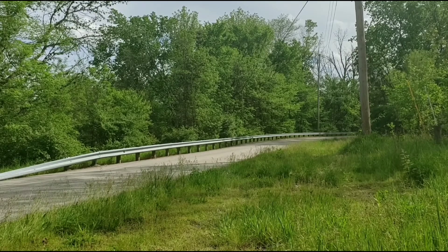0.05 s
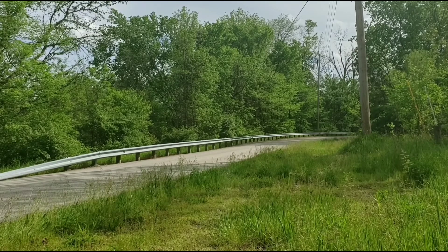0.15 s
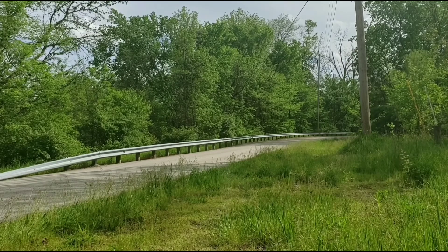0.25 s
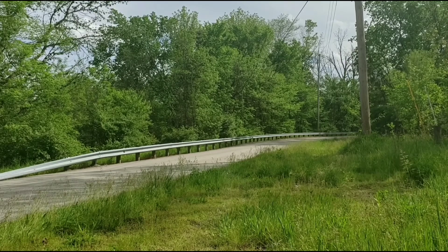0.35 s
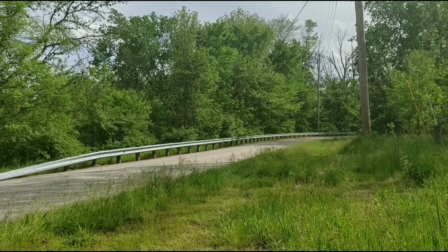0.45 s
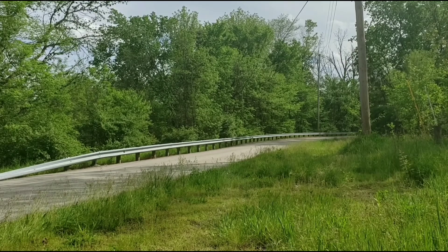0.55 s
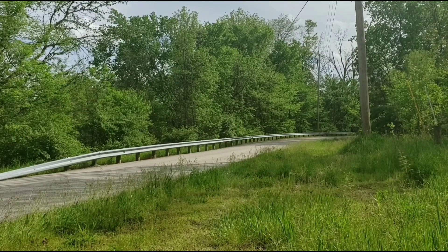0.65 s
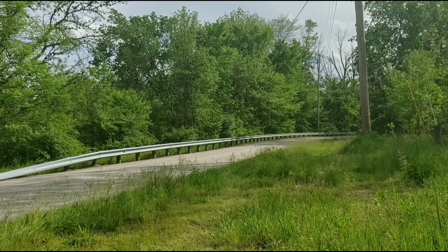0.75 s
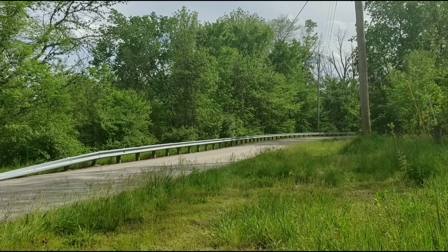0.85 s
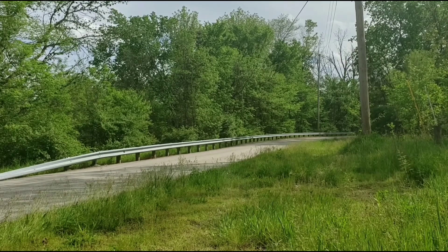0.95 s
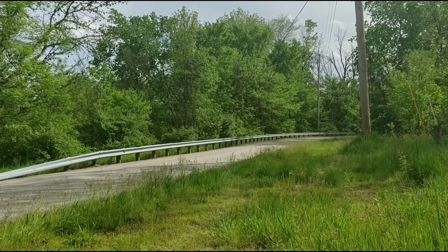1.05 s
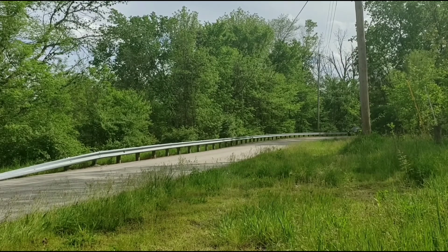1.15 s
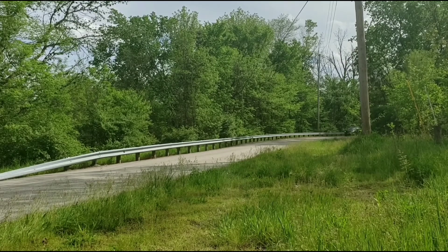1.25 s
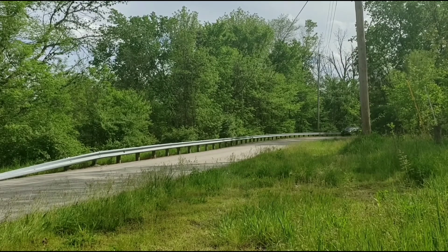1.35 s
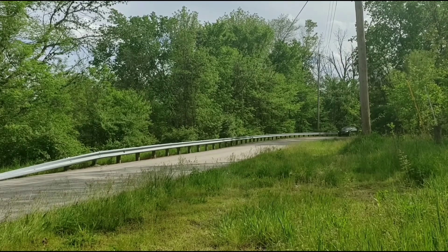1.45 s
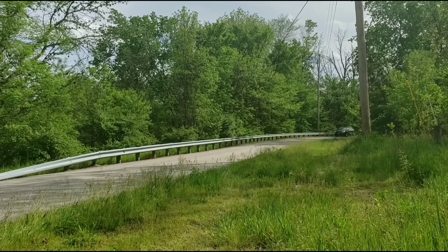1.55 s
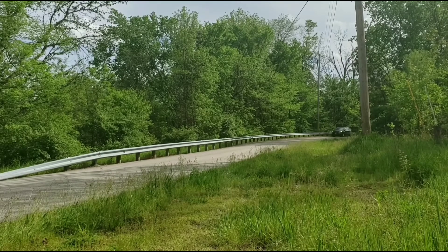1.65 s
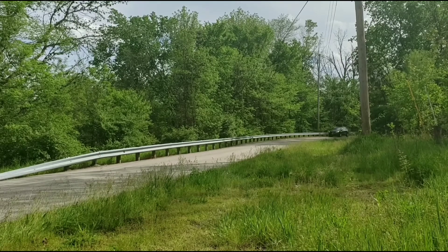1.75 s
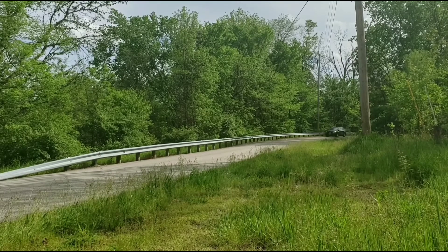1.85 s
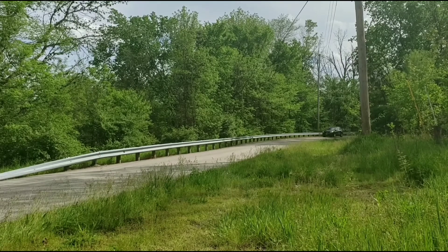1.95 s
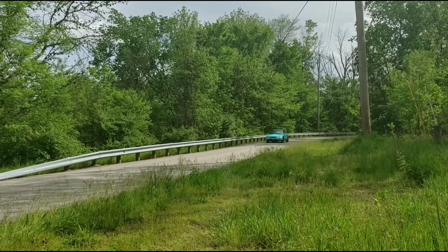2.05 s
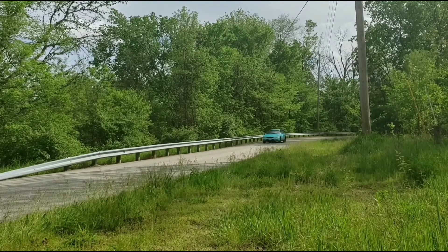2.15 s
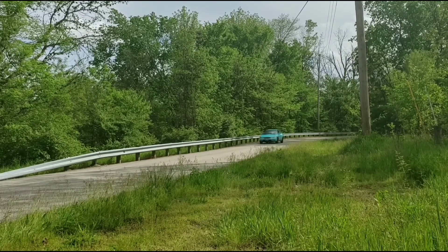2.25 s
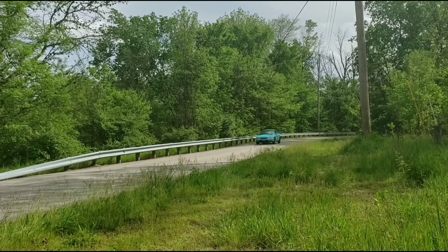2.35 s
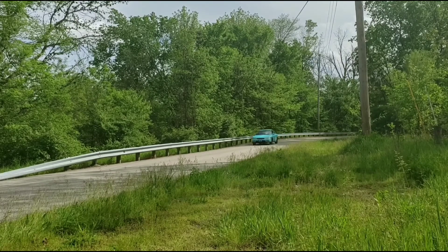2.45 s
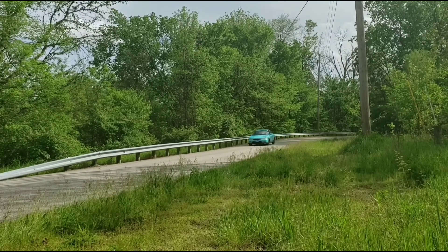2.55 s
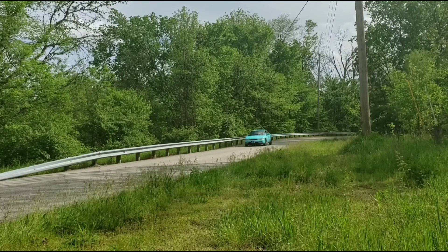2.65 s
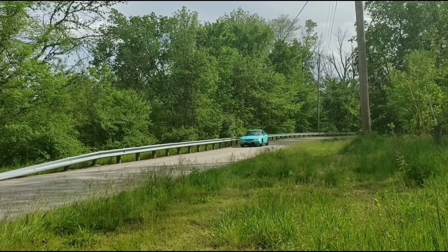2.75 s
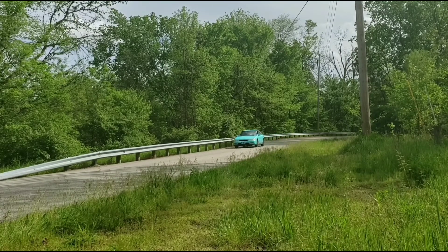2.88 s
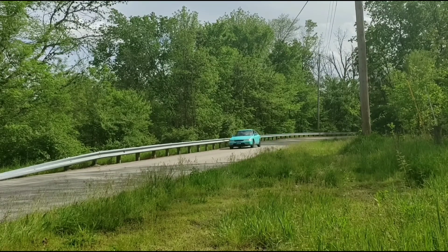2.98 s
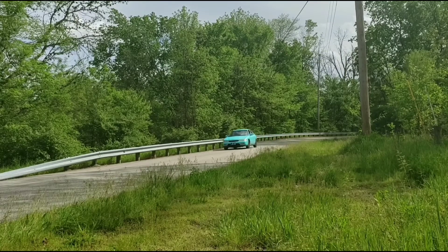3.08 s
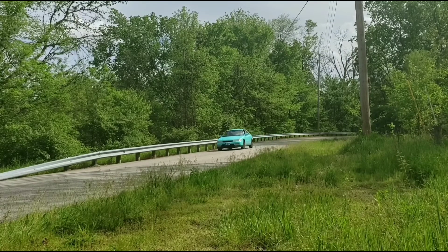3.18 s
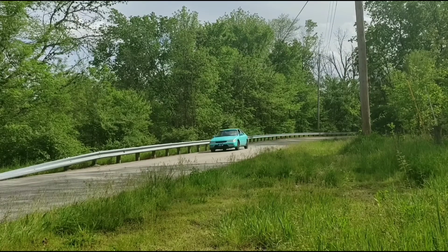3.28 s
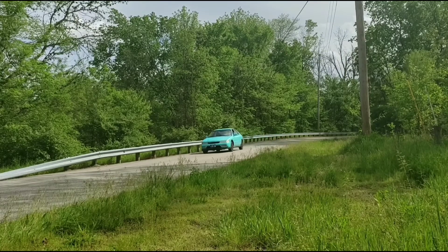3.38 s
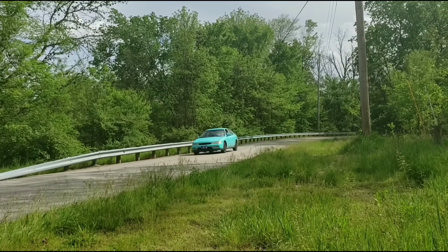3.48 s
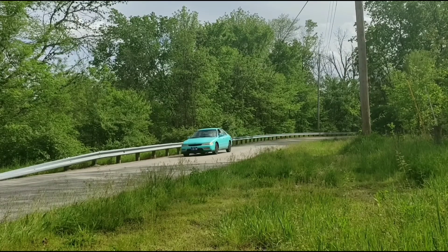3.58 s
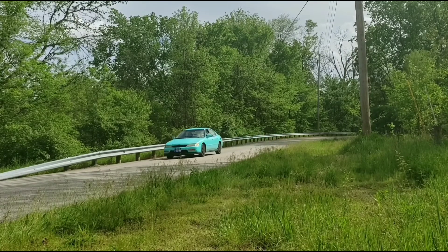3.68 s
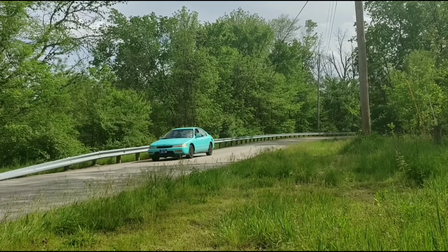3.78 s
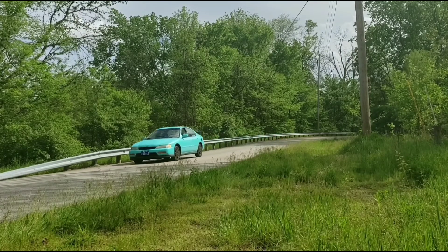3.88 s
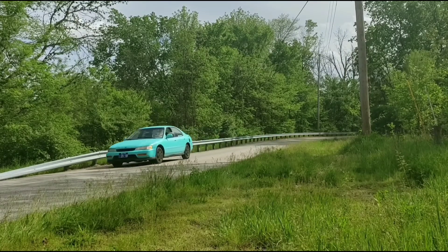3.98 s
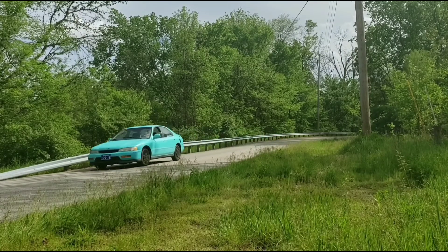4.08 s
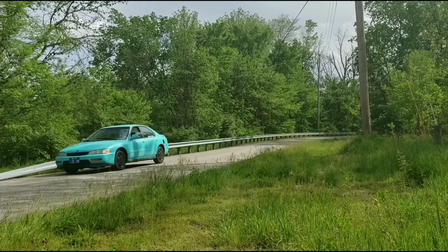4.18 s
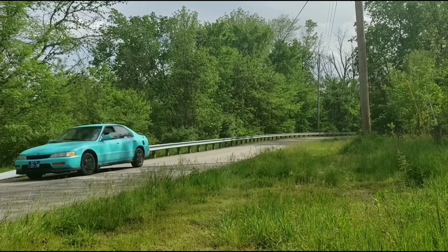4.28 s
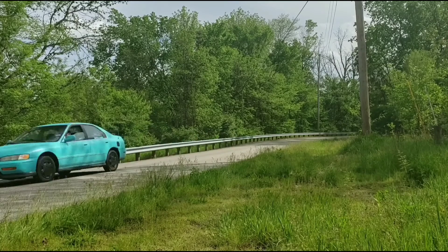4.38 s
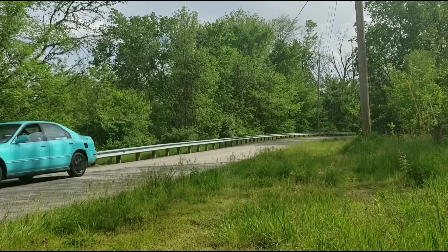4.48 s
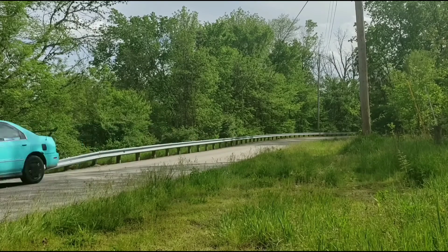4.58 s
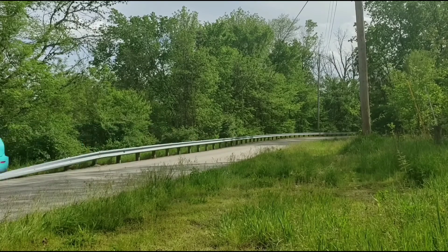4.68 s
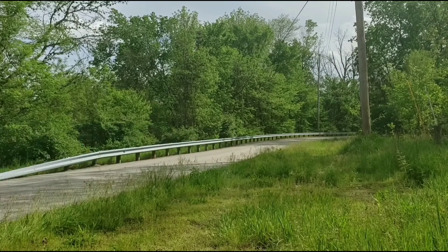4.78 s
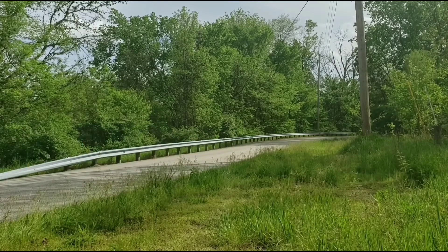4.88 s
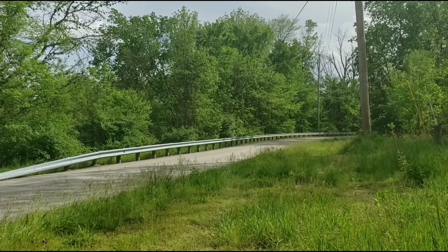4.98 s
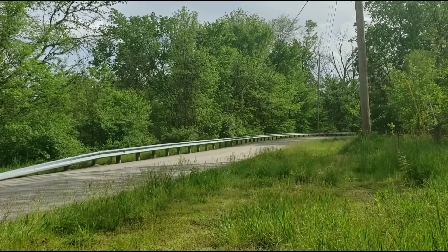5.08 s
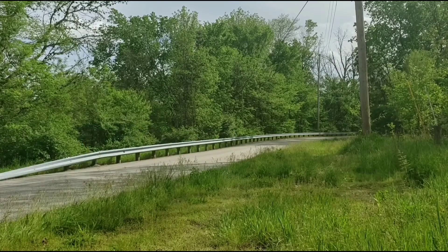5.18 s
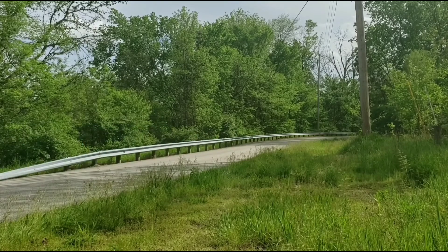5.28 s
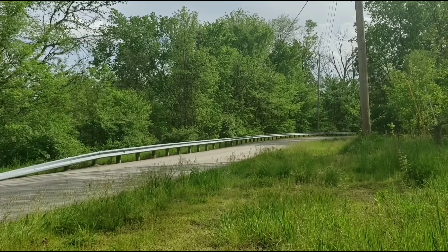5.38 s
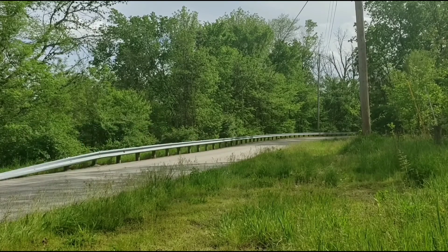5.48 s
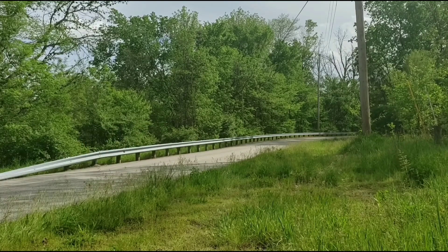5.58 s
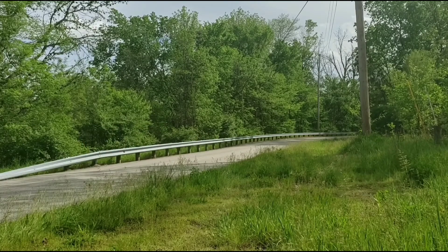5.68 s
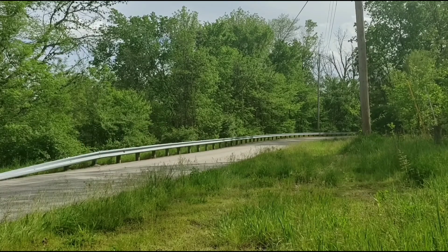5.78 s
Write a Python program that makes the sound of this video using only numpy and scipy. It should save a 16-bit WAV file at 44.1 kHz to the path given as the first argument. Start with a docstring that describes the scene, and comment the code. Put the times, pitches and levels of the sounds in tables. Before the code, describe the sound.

From 0 to about 2 s a quiet, unsteady low engine drone sags slowly in pitch far off, over soft dull roar and airy hiss. A songbird whistles a quick falling phrase four times, roughly every 0.4 s until 1.5 s, with thin notes from other birds and a soft echo from trees. Faint dry ticks flick around 1.7-1.85 s. Near 2.07 s everything drops to almost nothing for a twentieth of a second. Then a much louder, buzzy exhaust enters abruptly, pulling hard and climbing slightly until 3.45 s as hiss and roar swell. At 3.5 s it gives way to a lower, boomier, steadier note that grows and gently falls. It sweeps past close on the left, fullest around 4.7-5 s, with bright tyre hiss and a sharp pulsing metallic rasp at 4.95 s. Pitch keeps sinking and the noise thins, the deep exhaust continuing to the end near 5.8 s.

```python
"""A small car with a raspy exhaust on a country road, heard by a spaced pair of microphones.
Its note is a sum of orders of the firing rate; puffs ring the tailpipe, shaped noise gives hiss and roar.
It drones far off under whistled birdsong and faint ticks of noise; after a near-silence it pulls hard
nearby, and a lower, boomier note takes over as it sweeps past to the left and sinks in pitch."""
import sys
import numpy as np
from scipy import signal
from scipy.io import wavfile
from scipy.ndimage import uniform_filter1d

SR = 44100
rng = np.random.default_rng(int(sys.argv[2]) if len(sys.argv) > 2 else 0)


def transcribe(signal):
    """Save signal, clipped to [-1, 1], as a 16-bit WAV file at the path in sys.argv[1]."""
    frames = np.atleast_2d(signal).T
    limited = np.clip(frames, -1, 1)
    pcm = np.round(limited * 32767).astype(np.int16)
    wavfile.write(sys.argv[1], SR, pcm)


N = 257103

# Exhaust note far off. Each row: time in seconds, firing rate in Hz, levels in dB of the first order,
# the second order and the higher orders.
FAR_NOTE = [(0, 74.9, -48, -45, -64), (.34, 72.7, -37.5, -44, -65), (.68, 68.1, -40, -54, -62),
            (1.1, 65.35, -42.5, -50.5, -64), (1.7, 62.33, -41.5, -56, -67), (2.06, 61.3, -38, -50, -60)]
# Exhaust note pulling hard. Each row: time in seconds, firing rate in Hz, levels in dB of the first,
# second and fourth orders and of the higher orders.
PULL_NOTE = [(2.12, 109.5, -31.5, -23, -52.5, -51.5), (2.5, 112.8, -32, -21.5, -52.5, -47.5),
             (2.87, 115, -33.5, -23, -47, -38), (3.1, 116.9, -34.5, -20.5, -41, -44),
             (3.25, 117.3, -33.5, -22, -36, -40.5), (3.42, 117.4, -34.5, -22, -37.5, -36.5),
             (3.48, 116.6, -39, -29, -61, -52)]
# Exhaust note passing. Each row: time in seconds, firing rate in Hz, levels in dB of the first,
# second and third orders and of the higher orders.
PASS_NOTE = [(3.05, 105.7, -55, -42, -70, -63), (3.2, 104.1, -55, -38, -70, -56),
             (3.43, 108.2, -52, -32, -63, -63), (3.52, 108.5, -26.5, -29, -56, -69),
             (3.62, 104.7, -23, -29, -45, -51), (3.95, 102.6, -23, -28, -39, -54.5),
             (4.34, 100.7, -21, -33, -36.5, -50), (4.5, 98.96, -20, -27.5, -43, -49),
             (4.66, 97.94, -19, -20.5, -43, -44), (4.98, 95.6, -13, -22, -30.5, -42.5),
             (5.26, 92, -15.5, -27, -26.5, -39), (5.5, 89.4, -18.5, -25.5, -27.5, -41),
             (5.83, 86.26, -21, -25, -27, -40)]
FAR_LOW, PULL_LOW, PASS_LOW = (1, 2), (1, 2, 4), (1, 2, 3)  # orders that have a level column

# Middle orders. Each row: order, level in dB above the higher orders, growth in dB per second.
FAR_MIDDLE = [(3, 7, 0.5), (4, -6.5, 7.1)]
PASS_MIDDLE = [(4, 0.92, 3.23)]
# The buzz of higher orders; half orders come from cylinders that fire unevenly.
# Each row: order, relative level in dB.
FAR_BUZZ = [(5, -7), (6, 0), (8, -9.5)]
PULL_BUZZ = [(1.5, -19), (2.5, -23), (5, -10), (6, -32), (6.5, -5), (7, 1.5), (7.5, -30), (8, -8),
             (8.5, -7), (9, -4), (10, -9), (11, -1.5)]
PASS_BUZZ = [(5, 4.5), (6, -7), (7, 3), (7.5, -6), (8, 6), (8.5, -30), (9, -0.5), (10, -5), (11, -8),
             (12, -8), (13, -15)]
# Colour that the pipe gives the buzz. Each row: frequency in Hz, gain in dB.
PIPE_COLOUR = [(150, -11), (430, -10), (520, 2.5), (620, -3.5), (800, 1), (1050, 0), (1300, -12)]

# Resonances of the tailpipe. Each row: frequency in Hz, width in Hz, relative level in dB,
# time in seconds from which it is fully open.
TAILPIPE_RINGS = [(1170, 90, -2, 5), (1580, 120, 2, 5.14), (2300, 70, -1, 5.35), (4110, 90, -8, 5.1)]
RASP_S, RASP_DB = 4.95, -47.5  # moment of the loudest rasp, and its level before the left-right balance
RASP_RISE_DB_PER_S, RASP_FALL_DB_PER_S = 39, 8

# Course of the noise. Each row: rise in dB per second, deepest start in dB, fall in dB per second,
# hiss level in dB, extra treble in dB, share of the rise that the treble follows, roar level in dB,
# share of the rise and fall that the roar follows.
FAR_NOISE = (10, -8, -1.5, -55.5, -9.5, -0.7, -45.5, 0.25)
NEAR_NOISE = (12.5, -7.5, 5, -38, 4.5, 0.87, -34, 0.68)
PASS_NOISE = (4.5, -3, 9.5, -39, 3.5, 0.62, -34.5, 0.54)
# Times of each swell of noise. Each row: start, top, beginning of the fall and end, all in seconds.
FAR_SWELL = (0, .8, 1.3, 2.3)
NEAR_SWELL = (1.9, 3.0, 3.38, 3.47)
PASS_SWELL = (3.49, 4.62, 4.88, 6)
FADE_S, FADE_DB = .2, -30  # beyond its start and end a swell loses 30 dB each 0.2 s, down to -60 dB
# Spectra of hiss and roar. Each row: frequency in Hz, relative density in dB per Hz.
FAR_HISS = [(700, -25), (1100, -2), (1600, -3), (2250, -13), (4570, -15.5), (6880, -17), (7900, -24),
            (8700, -61), (10800, -42), (12000, -32), (14500, -29)]
NEAR_HISS = [(800, -49), (1150, 0), (1400, -2), (2600, -4), (3130, -12), (4230, -10), (4720, -11),
             (6600, -9.5), (8600, -20.5), (11900, -16.5), (14500, -19)]
PASS_HISS = [(800, -40), (1300, 1), (2600, -5), (4200, -10.5), (6800, -14), (8600, -22), (11900, -16.5),
             (14500, -17.5)]
FAR_ROAR = [(15, -11), (30, -6), (60, 23), (150, 21), (280, 11.5), (420, 1), (800, 9.5), (1150, 3),
            (1500, -40)]
NEAR_ROAR = [(15, -18), (45, 5), (100, 10), (250, 12.5), (550, 4), (800, 13), (1050, 3), (1250, -0.5),
             (1600, -51)]
FIZZ_S, FIZZ_WIDTH_S, FIZZ_DB = 1.82, 0.19, 9  # the far treble brightens for a moment

# Left-right balance with the car ahead and abeam to the left.
# Each row: frequency in Hz, left minus right in dB.
AHEAD_BALANCE = [(60, 0.45), (150, 0.78), (370, 0.32), (920, 3), (2280, 2.3), (5650, 7.5), (14000, 12.3)]
ABEAM_BALANCE = [(60, 0.53), (150, 0.45), (370, 1.42), (920, 2.9), (2280, 5.75), (5650, 13.8),
                 (14000, 20.8)]
# Likeness of the noise at the two microphones. Each row: frequency in Hz, left-right correlation.
LIKENESS = [(60, 1), (300, 0.93), (700, 0.44), (2000, 0.63), (5000, 0.42), (9000, 0.087)]
FAR_LEAD_MS, AHEAD_LEAD_MS, ABEAM_LEAD_MS = -0.12, 0.046, 0.56  # how much earlier the left hears the car
BASS_LEAD_MS = 0.067  # the low and middle orders reach the left side a little earlier still
SPREAD = 0.11  # turns, times the order squared, by which these orders drift apart once the car is abeam
SWEEP_S, SWEEP_WIDTH_S = 4.7, .5  # the car swings from ahead to abeam

# One phrase of the songbird. Each row: time in seconds from the phrase start, length in seconds,
# start, middle and end pitch in Hz, level in dB before the phrase level is added.
PHRASE = [(-.022, .024, 5400, 5000, 4550, -77), (0, .038, 4500, 4050, 3750, -65),
          (.045, .015, 3300, 3800, 4300, -63), (.108, .04, 2790, 2740, 2100, -69),
          (.188, .026, 3300, 3150, 3000, -67), (.235, .097, 2450, 2140, 2080, -67.5)]
# Repeats of the phrase. Each row: start in seconds, phrase level in dB.
PHRASES = [(.045, 3.5), (.44, 6.5), (0.831, 8.5), (1.225, 9)]
# Thin notes of other birds. Each row: start in seconds, length in seconds, start, middle and end pitch
# in Hz, level in dB before the balance.
BIRD_NOTES = [(0, .03, 4600, 4580, 4500, -64), (.125, 0.029, 4570, 3970, 3470, -69),
              (0.274, 0.055, 5150, 4780, 4700, -64), (0.496, 0.083, 4020, 3990, 3980, -65),
              (0.79, 0.085, 5900, 5630, 5800, -73), (0.858, 0.081, 7370, 7400, 7350, -76),
              (0.947, 0.049, 5300, 4640, 5400, -65), (.735, 0.0398, 4810, 4550, 5550, -69),
              (1.02, 0.034, 5750, 5600, 5730, -70), (1.447, .03, 4240, 4010, 3600, -63)]
# Faint dry ticks. Each row: start in seconds, initial noise level in dB before the band filter.
TICKS = [(1.7074, -63), (1.7215, -62), (1.7698, -66), (1.8033, -63), (1.8367, -66)]

SILENCE_START_S, SILENCE_END_S = 2.0652, 2.1136
CUT_S = .002  # the far sound starts and stops within this time
EDGE_HZ = 14530  # upper band limit


def amp(db):
    """Amplitude ratio: 20 dB is a factor of ten in pressure."""
    return 10 ** (np.asarray(db) / 20)


def evened(x):
    """Normalization to unit root-mean-square."""
    return x / np.sqrt(np.mean(abs(x) ** 2) + 1e-20)


def read(points, hz):
    """Interpolation of a spectrum along a logarithmic frequency axis."""
    f, value = np.transpose(points)
    return np.interp(np.log(hz + 1), np.log(f + 1), value)


def columns(rows, t):
    """Linear interpolation of each column over time."""
    s, *cols = np.transpose(rows)
    return [np.interp(t, s, c) for c in cols]


def add(mix, s, sound):
    """Superposition of a sound on the mix from time s, cut at the end of the mix."""
    part = mix[..., round(s * SR):round(s * SR) + sound.shape[-1]]
    part += sound[..., :part.shape[-1]]


def wander(hz, count):
    """Narrow-band modulation: complex noise through a two-pole low-pass, about hz wide and of rms 1."""
    step = 128  # samples between drawn points
    t = np.arange(-4096, count + 256, step)
    z = rng.standard_normal(len(t)) + 1j * rng.standard_normal(len(t))
    r = np.exp(-2 * np.pi * hz * step / SR)
    slow = evened(signal.lfilter([1], [1, -2 * r, r * r], z))
    return np.interp(np.arange(count), t, slow)


def firings(rows):
    """Phase as the integral of frequency: a running count of firings."""
    hz = columns(rows, np.arange(N) / SR)[0]
    return np.cumsum(hz) / SR


def bearing_ms(t):
    """Interaural-style delay: the left side's lead is steady far off, then grows as the car passes."""
    swing = (1 + np.tanh((t - SWEEP_S) / SWEEP_WIDTH_S)) / 2
    near_ms = AHEAD_LEAD_MS + (ABEAM_LEAD_MS - AHEAD_LEAD_MS) * swing
    return np.where(t < SILENCE_START_S, FAR_LEAD_MS, near_ms)


def balance_db(hz, lead_ms):
    """Acoustic shading: the right microphone is shaded more as the car moves abeam to the left."""
    abeam = np.clip(lead_ms / .5, 0, 1)
    return (1 - abeam) * read(AHEAD_BALANCE, hz) + abeam * read(ABEAM_BALANCE, hz)


def exhaust(rows, low_orders, middle, buzz, rough, buzz_rough, fade_s):
    """Harmonic synthesis: orders of the firing rate, each wavering; a phase lag delays the right side."""
    start, end = rows[0][0], rows[-1][0]
    span = np.arange(round(start * SR) - 4000, round(end * SR) + 4000)
    t = np.unique(span.clip(0, N - 1) / SR)
    hz, *low_db, buzz_db = columns(rows, t)
    low = list(zip(low_orders, low_db))
    low += [(k, buzz_db + db + growth_db * (t - start)) for k, db, growth_db in middle]
    lead_ms = bearing_ms(t)
    turns = firings(rows)[round(t[0] * SR):][:len(t)]
    # the low orders are spread over the cycle; the buzz comes bunched, once a firing
    spread = -SPREAD * lead_ms / ABEAM_LEAD_MS
    orders = [(k, db, rough, spread * k ** 2, BASS_LEAD_MS) for k, db in low]
    orders += [(k, buzz_db + db + read(PIPE_COLOUR, k * hz), buzz_rough, k / 2, 0) for k, db in buzz]
    note = np.zeros((2, len(t)))
    for k, db, share, offset, extra_ms in orders:
        waver = 1 + share * wander(11.8, count=len(t))
        tone = np.sqrt(2) * amp(db) * waver * np.exp(2j * np.pi * (k * turns + offset))
        half = amp(balance_db(k * hz, lead_ms) / 2)
        late = np.exp(-2j * np.pi * k * hz * (lead_ms + extra_ms) / 1000)
        note += np.real([tone * half, tone * late / half])
    fade = np.clip(np.minimum(t - start, end - t) / fade_s + 1, 0, 1)
    out = np.zeros((2, N))
    add(out, t[0], note * fade)
    return out


def rasp(uneven, scatter_db, puff, grain):
    """Impulsive excitation of resonators: sharp noisy puffs, strong and weak in turn, ring the pipe."""
    t = np.arange(N) / SR
    turns = firings(PASS_NOTE) + .58  # just ahead of the buzz
    firing = turns.astype(int)
    scatter = amp(scatter_db * rng.standard_normal(N))[firing]
    size = (1 + uneven * (-1.) ** firing) * scatter
    drive = size * np.exp(-(turns % 1) / puff) * (1 + grain * rng.standard_normal(N))
    rings = np.zeros(N)
    for hz, width, db, open_s in TAILPIPE_RINGS:
        ring = evened(signal.lfilter(*signal.iirpeak(hz, hz / width, SR), drive))
        rings += amp(db - 10 * (t < open_s)) * ring  # 10 dB weaker until its moment
    course_db = np.minimum(RASP_RISE_DB_PER_S * (t - RASP_S), RASP_FALL_DB_PER_S * (RASP_S - t))
    left = evened(rings) * amp(RASP_DB + course_db)
    right = np.interp(t - bearing_ms(t) / 1000, t, left)
    return np.array([amp(2.0) * left, amp(-3.0) * right])


def swell(t, times, rise_db, deepest_db, fall_db, hiss_db, treble_db, treble_share, roar_db, roar_share):
    """Exponential envelopes, straight in dB: one rise, hold and fall sets hiss, extra treble and roar."""
    start, top, sinks, until = times
    up_db = np.clip(rise_db * (t - top), deepest_db, 0)
    down_db = np.minimum(fall_db * (sinks - t), 0)
    edge_db = FADE_DB * np.clip(np.maximum(start - t, t - until) / FADE_S, 0, 2)
    return (hiss_db + up_db + down_db + edge_db,
            treble_db + treble_share * up_db,
            roar_db + roar_share * (up_db + down_db) + edge_db)


def rush(times, shape, hiss, roar, patchy_db, flicker_db, fizz_db=0):
    """Shaped noise for tyre hiss and pipe roar: random short-time spectra, delayed by the car's bearing."""
    size, hop = 1024, 256  # samples
    frames = N // hop + 5
    hz = np.fft.rfftfreq(size, 1 / SR)[:, None]
    t = np.arange(frames) * hop / SR
    a, b, c, d, patches = rng.standard_normal((frames, size // 2 + 1, 5)).T
    # patches are smooth over frequency and time; flicker moves the whole spectrum at once
    patches = evened(uniform_filter1d(uniform_filter1d(patches, size=10, axis=0), size=12, axis=1))
    flicker = evened(uniform_filter1d(rng.standard_normal(frames), size=3))
    hiss_db, treble_db, roar_db = swell(t, times, *shape)
    treble_db = treble_db + fizz_db * np.exp(-((t - FIZZ_S) / FIZZ_WIDTH_S) ** 2)
    tilt = np.clip(np.log2(hz / 2500 + 1e-9) / 1.86, 0, 1)  # treble share: none to 2500 Hz, all from 9 kHz
    power = [amp(read(colour, hz)) ** 2 for colour in (hiss, roar)]
    high, low = (p / p.sum() for p in power)
    gain = np.sqrt(high * amp(hiss_db + treble_db * tilt) ** 2 + low * amp(roar_db) ** 2)
    gain = gain * amp(patchy_db * patches + flicker_db * flicker)
    lead_ms = bearing_ms(t)
    same = np.clip(read(LIKENESS, hz), 0, 1)
    half = amp(balance_db(hz, lead_ms) / 2)
    left = a + 1j * b
    shared = same * left * np.exp(-2j * np.pi * hz * lead_ms / 1000)
    right = shared + np.sqrt(1 - same ** 2) * (c + 1j * d)
    spectra = gain * np.array([left * half, right / half])
    return signal.istft(spectra, nperseg=size, noverlap=size - hop)[1][:, :N]


def whistle(length, start_hz, middle_hz, end_hz, db):
    """Frequency modulation: a near-pure tone gliding along a parabola through three pitches."""
    u = np.linspace(0, 1, round(length * SR))
    hz = np.polyval(np.polyfit([0, .5, 1], [start_hz, middle_hz, end_hz], 2), u)
    tone = np.sqrt(2) * np.sin(2 * np.pi * np.cumsum(hz) / SR)
    return amp(db) * tone * signal.windows.tukey(len(u), .5)


def birds():
    """Scattering: whistled notes are convolved with decaying noise, the soft echo of the trees."""
    song = np.zeros(N)
    for start, phrase_db in PHRASES:
        for s, *note in PHRASE:
            add(song, start + s, amp(phrase_db) * whistle(*note))
    for s, *note in BIRD_NOTES:
        add(song, s, whistle(*note))
    t = np.arange(SR // 2) / SR
    trees = rng.standard_normal((2, len(t))) * amp(-60 * t / .6) * (t > .004)  # falls 60 dB in 0.6 s
    echo = signal.fftconvolve(song[None], trees / np.linalg.norm(trees[0]), axes=1)[:, :N]
    direct = np.array([amp(1.5) * np.roll(song, 6), amp(-1.5) * song])  # left is 6 samples later
    return direct + amp(-5.5) * echo


def ticks():
    """Transients: band-passed noise puffs that fall 60 dB in 4 ms, mostly on the left."""
    out, t = np.zeros((2, N)), np.arange(400) / SR
    band = signal.butter(3, [3500, 7800], "band", fs=SR)
    for s, db in TICKS:
        puff = rng.standard_normal(len(t)) * amp(db - 60 * t / 0.004)
        add(out, s, signal.lfilter(*band, puff) * amp([[0], [-8]]))
    return out


def hush():
    """Integrated noise less its moving average: a very faint dull noise for the silence."""
    walk = amp(-70.5) * rng.standard_normal((2, N)).cumsum(1)
    return walk - uniform_filter1d(walk, size=40, axis=1)


def scene():
    """Superposition in sequence: the far drone with birds, the near-silence, then the near car."""
    far = exhaust(FAR_NOTE, FAR_LOW, FAR_MIDDLE, FAR_BUZZ, rough=.45, buzz_rough=.6, fade_s=.01)
    far += rush(FAR_SWELL, FAR_NOISE, FAR_HISS, FAR_ROAR, patchy_db=-0.8, flicker_db=1.1, fizz_db=FIZZ_DB)
    far += birds() + ticks()
    near = exhaust(PULL_NOTE, PULL_LOW, [], PULL_BUZZ, rough=.09, buzz_rough=.4, fade_s=.02)
    near += exhaust(PASS_NOTE, PASS_LOW, PASS_MIDDLE, PASS_BUZZ, rough=.085, buzz_rough=.15, fade_s=.08)
    near += rasp(uneven=.3, scatter_db=1.5, puff=.035, grain=.45)
    near += rush(NEAR_SWELL, NEAR_NOISE, NEAR_HISS, NEAR_ROAR, patchy_db=0.96, flicker_db=0.2)
    near += rush(PASS_SWELL, PASS_NOISE, PASS_HISS, NEAR_ROAR, patchy_db=1.53, flicker_db=0.7)
    t = np.arange(N) / SR
    far_gate = np.clip(np.minimum(t, SILENCE_START_S - t) / CUT_S, 0, 1)
    silence_gate = (t > SILENCE_START_S) * (t < SILENCE_END_S)
    return far * far_gate + near * (t > SILENCE_END_S) + hush() * silence_gate


def record(dry):
    """Band limitation: a linear-phase low-pass removes what lies above the upper edge."""
    lowpass = signal.firwin(1023, EDGE_HZ, window=("kaiser", 9), fs=SR)
    return signal.oaconvolve(dry, lowpass[None], "same")


dry = scene()
out = record(dry)
transcribe(out)
```